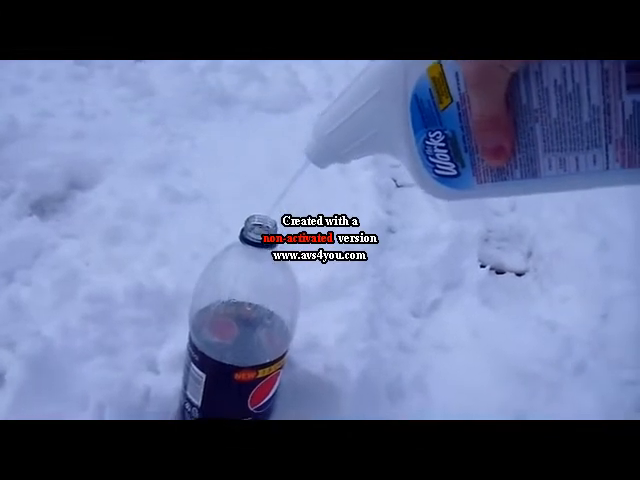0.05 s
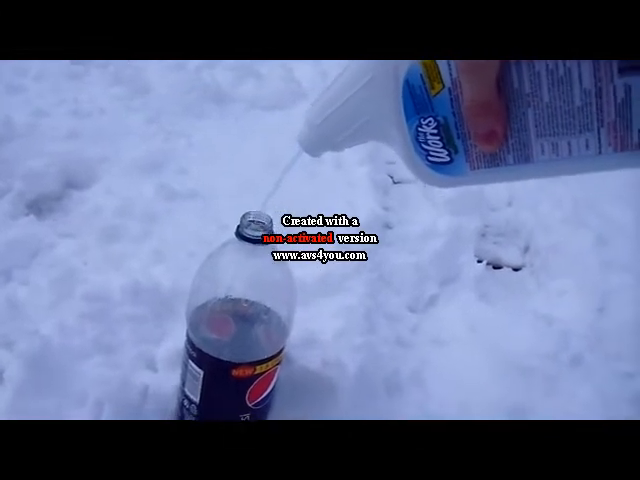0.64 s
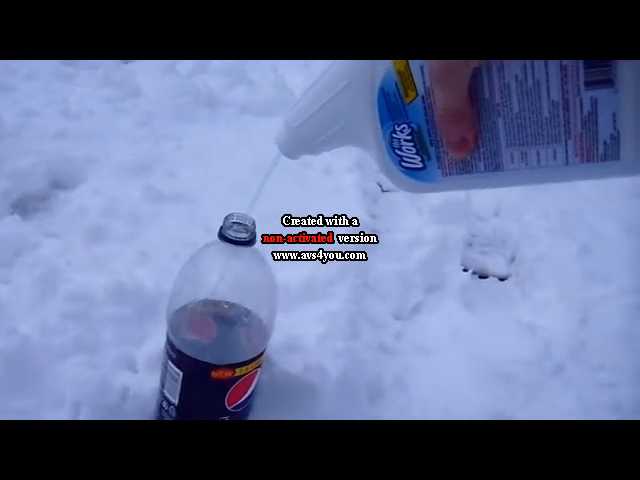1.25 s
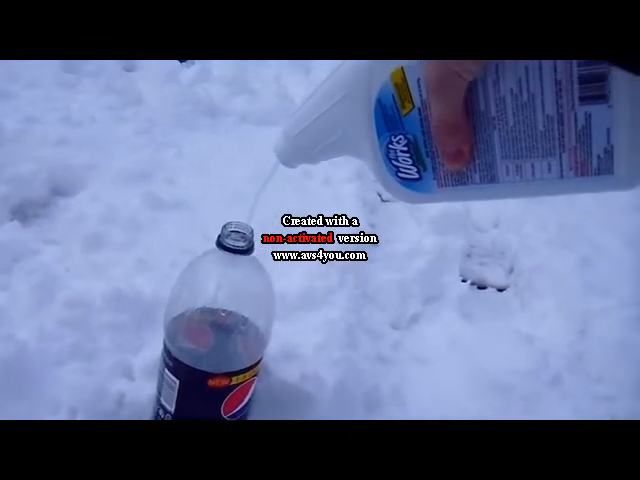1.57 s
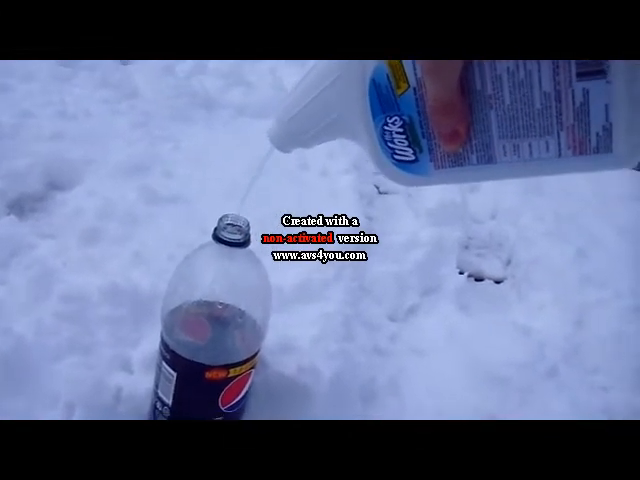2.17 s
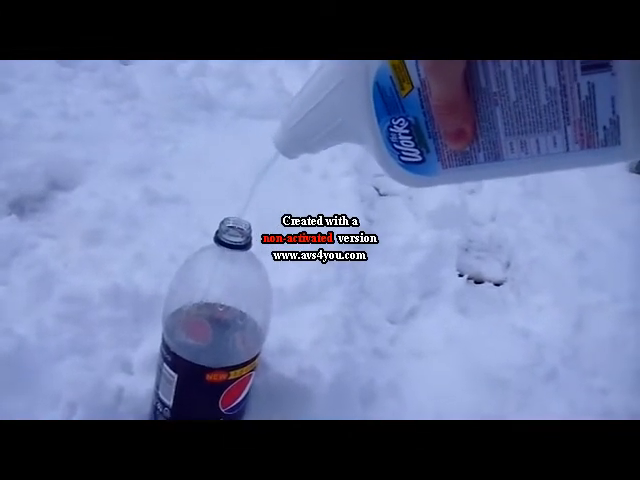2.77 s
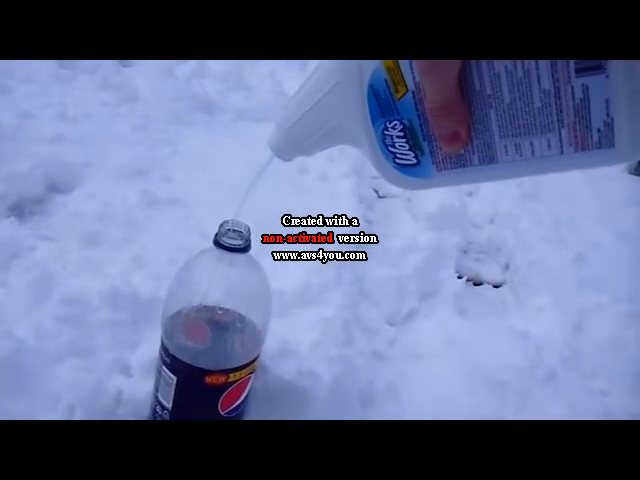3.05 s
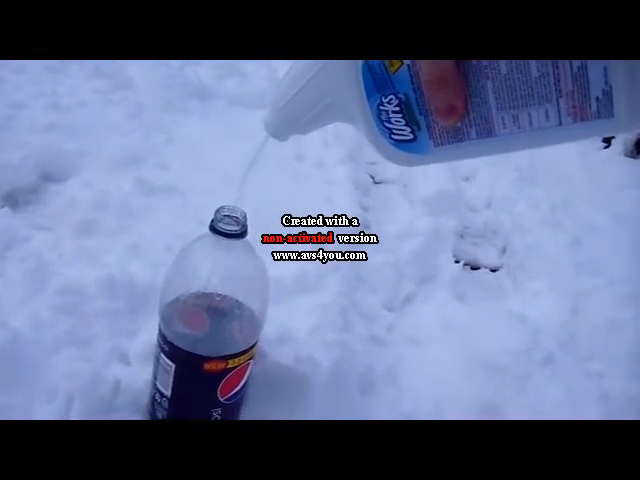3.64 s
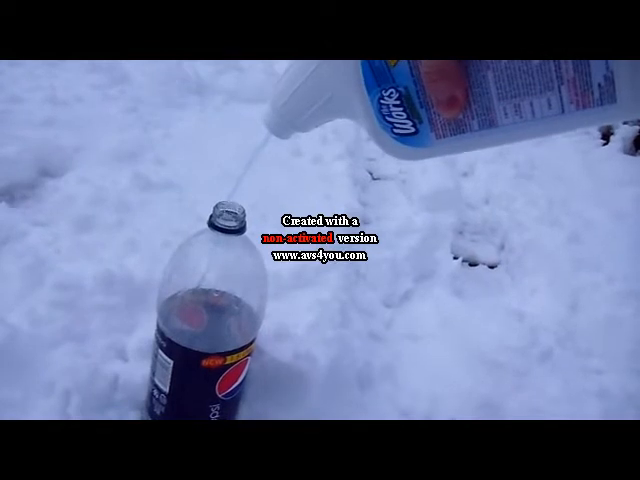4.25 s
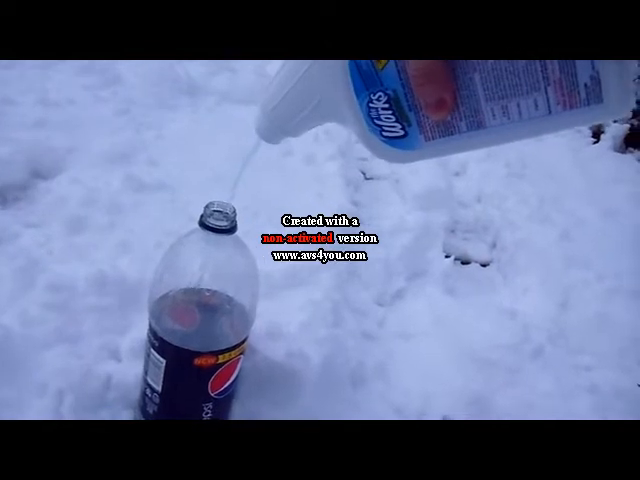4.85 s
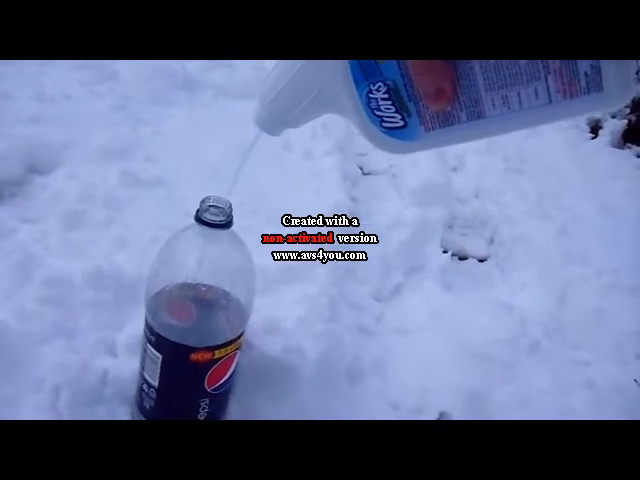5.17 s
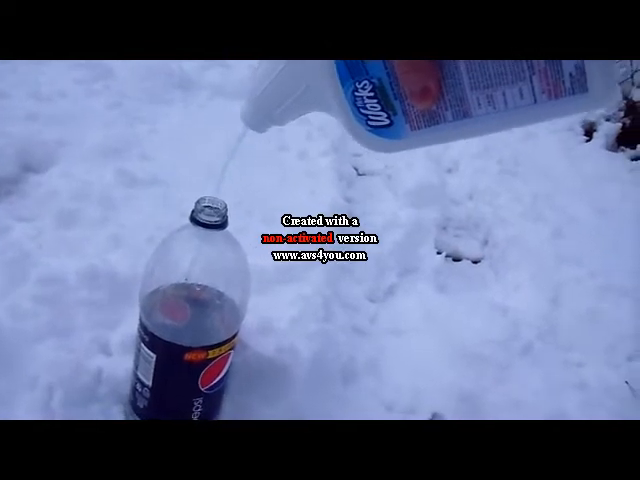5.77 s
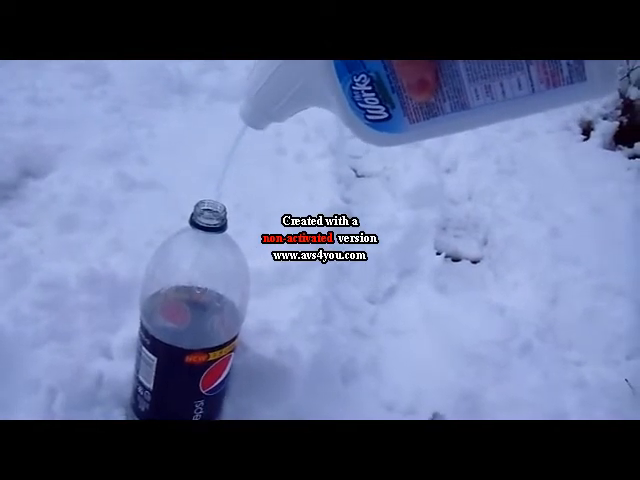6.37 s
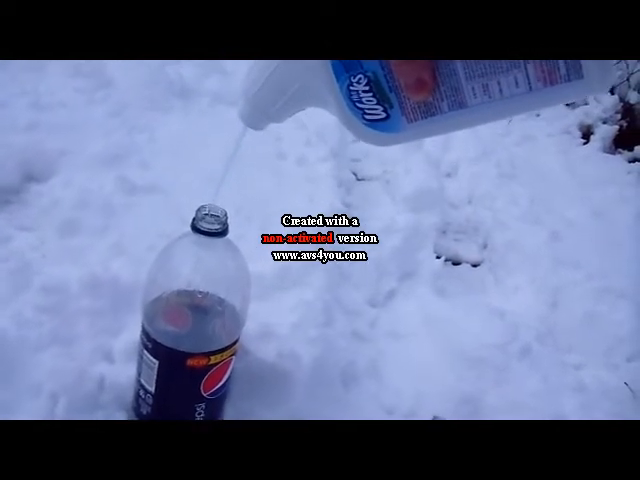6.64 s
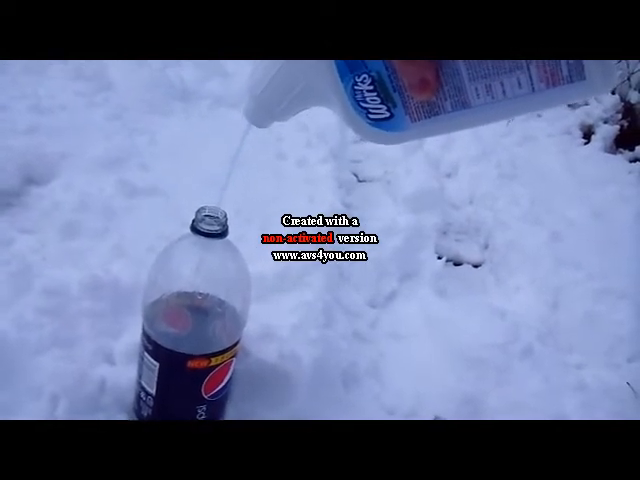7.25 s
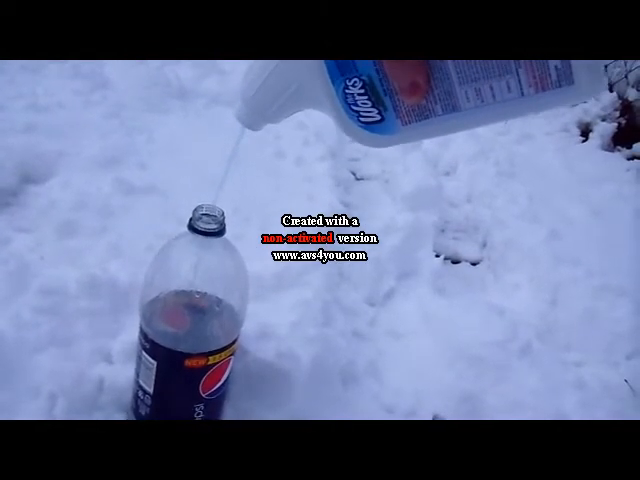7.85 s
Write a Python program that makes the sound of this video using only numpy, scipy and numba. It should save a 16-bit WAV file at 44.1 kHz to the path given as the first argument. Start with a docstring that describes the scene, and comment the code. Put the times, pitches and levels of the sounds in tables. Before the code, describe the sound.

A thin stream of liquid trickles and crackles into a plastic bottle outdoors, over a low steady rumble.

```python
"""Pouring into a plastic bottle

A thin stream falls from a jug into a half-full plastic bottle standing in snow. It breaks into drops; each
slaps the surface and traps a bubble that rings briefly, heard through the neck. Larger bubbles ring lower
notes, heavy blobs knock on the plastic and stray drops crack on the rim. Behind it all are a low rumble, far
traffic, one faint, distant horn and a brief hum."""
import sys
import numpy as np
from scipy import signal
from scipy.fft import rfft, irfft
from scipy.io import wavfile
from scipy.ndimage import uniform_filter1d
from numba import njit

SR = 44100
rng = np.random.default_rng(int(sys.argv[2]) if len(sys.argv) > 2 else 0)


def log_audio(samples):
    """Write samples as a 16-bit WAV file to the path given in sys.argv[1]."""
    # one column per channel
    frames = np.atleast_2d(samples).T
    # limit to full scale, then quantise
    limited = np.clip(frames, -1, 1)
    pcm = np.round(limited * 32767).astype(np.int16)
    wavfile.write(sys.argv[1], SR, pcm)


N = 348831

# strength of the stream, which twice runs smooth and almost silent: t/s, level/dB
STREAM_LEVEL = [(0.0, -64), (0.45, -66.5), (0.68, -57.5), (0.95, -62), (1.25, -54.5), (1.68, -56.5),
                (1.98, -51), (2.16, -54), (2.49, -50.5), (2.75, -61), (3.08, -67.5), (3.37, -69),
                (3.7, -56), (3.95, -47), (4.18, -55.5), (4.35, -55.5), (4.57, -54), (4.68, -58),
                (5.11, -53), (5.35, -53), (5.64, -54), (5.85, -52), (6.1, -52.5), (6.4, -53), (6.53, -50),
                (6.7, -54.5), (7.0, -51), (7.4, -51), (7.62, -49), (7.91, -50.5)]


def undb(db):
    """Turn decibels into a factor to multiply by."""
    return 10 ** (np.asarray(db) / 20)


def unit(x):
    """Scale a sound so that its average strength (rms) is 1."""
    return x / np.sqrt(np.mean(x ** 2))


def stream_level(t):
    """The stream's strength in dB at the times t."""
    return np.interp(t, *np.transpose(STREAM_LEVEL))


def wander(rate):
    """A smooth random wobble, about 1 in size, that takes a new turn rate times a second."""
    step = int(SR / rate)
    held = rng.standard_normal(N)[np.arange(N) // step]
    return 1.3 * uniform_filter1d(uniform_filter1d(held, step), step)


def colour(x, points):
    """Make some pitches louder and others softer, following rows of f/Hz, level/dB."""
    size = 2 ** 19
    hz, db = np.transpose(points)
    f = np.arange(size // 2 + 1) * SR / size
    gain = undb(np.interp(np.log(f + 1), np.log(hz), db))
    # fold the filter so that nothing rings before the sound that causes it
    cepstrum = irfft(np.log(gain))
    cepstrum[1:size // 2] *= 2
    cepstrum[size // 2 + 1:] = 0
    return irfft(rfft(x, size) * np.exp(rfft(cepstrum)))[:N]


@njit
def resonator(x, hz, width):
    """Let through a narrow band around a pitch that may move."""
    out, band, low = np.empty(len(x)), 0., 0.
    for i in range(len(x)):
        tuning, damping = np.tan(np.pi * hz[i] / SR), width / hz[i]
        swing = (band + tuning * (x[i] + 1e-18 - low)) / (1 + tuning * (tuning + damping))
        band = 2 * swing - band
        low += 2 * tuning * swing
        out[i] = damping * swing
    return out


def ring(x, modes, stretch=1):
    """Let x ring a set of notes (f/Hz, width/Hz, level/dB); stretch multiplies their pitches."""
    return sum(undb(db) * resonator(x, hz * stretch * np.ones(N), float(width))
               for hz, width, db in modes)


def pings(times, gains, hz, cycles, glide, size=640):
    """Short notes that start fast and die away; glide is the share by which their pitch rises."""
    age = np.arange(size) / SR
    turns = hz[:, None] * age
    fade = turns / np.reshape(cycles, (-1, 1))
    shape = (1 - np.exp(-turns)) ** 2 * np.exp(-fade)
    phase = 2 * np.pi * turns * (1 + glide * np.tanh(fade / 2))
    wave = shape / shape.max(1, keepdims=True) * np.sin(phase)
    at = (np.maximum(times, 0) * SR).astype(int)[:, None] + np.arange(size)
    return np.bincount(at.ravel(), (gains[:, None] * wave).ravel(), N)[:N]


def kicks(t, gains):
    """Pushes one sample long at the times t."""
    return np.bincount((np.maximum(t, 0) * SR).astype(int), gains, N)[:N]


def fading(x, decay_s):
    """Let every push die away smoothly."""
    return signal.lfilter([1], [1, -np.exp(-1 / (decay_s * SR))], x + 1e-18)


def outdoors(rumble_db=-43, hiss_db=-64, whine_db=-84, surge_at_s=3.12, surge_s=0.28):
    """Low rumble and far traffic swell slowly, under an even hiss with a thin whine."""
    # tone of the rumble and traffic: f/Hz, level/dB
    rumble_tone = [(8, -1.5), (22, 4), (32, -4.5), (50, -3.5), (68, -8.5), (98, -8), (140, -16.5),
                   (200, -27), (270, -31.5), (370, -28), (560, -28.5), (740, -26), (1300, -30.5),
                   (1800, -34), (3500, -64), (8000, -62.5)]
    # tone of the hiss: f/Hz, level/dB
    hiss_tone = [(1000, -5), (2000, 6.5), (2600, 1), (3600, -1), (6000, -1.5), (9000, -5.5), (12000, -5.5),
                 (15500, -9.5)]
    surge_db = np.exp(-((np.arange(N) / SR - surge_at_s) / surge_s) ** 2)  # one rise of 1 dB
    rumble = unit(colour(rng.standard_normal(N), rumble_tone))
    rumble *= undb(rumble_db + surge_db - 0.76 * wander(1.93))
    whine = unit(ring(rng.standard_normal(N), [(12010, 90, 0)]))
    hiss = unit(colour(rng.standard_normal(N), hiss_tone))
    return rumble + hiss * undb(hiss_db) + whine * undb(whine_db)


def stream(gain_db=1.5, spurt_db=2.0, lull_db=12, lull_s=0.015):
    """How loud the stream is over time: it wobbles into spurts and dips wherever it breaks."""
    # moments when the stream breaks: t/s
    breaks = [1.36, 1.795, 1.89, 3.57, 3.845, 4.08, 4.52, 5.17, 5.68, 6.145, 6.76, 6.84, 7.616, 7.724, 7.79,
              7.82]
    t = np.arange(N) / SR
    lulls = sum(np.exp(-((t - at) / lull_s) ** 2) for at in breaks)
    return undb(gain_db + stream_level(t) - lull_db * lulls + spurt_db * wander(25))


def thinned(t, chance, full_stream_db=-50):
    """A weak stream sheds fewer drops: say which fall, and the dB they gain by carrying the rest."""
    share = np.minimum(undb(stream_level(t) - full_stream_db) ** 1.5, 1)
    falls = chance < share
    return falls, -10 * np.log10(share[falls])


def splashes(t, db, hz, spray_db, cycles, spray_s, count=7,
             bubble_db=-5, slap_db=-11, slap_s=0.00048, droplet_db=1, mist_db=-5, lag_s=0.007):
    """A drop slaps the surface and rings one bubble; its spray falls back as droplets and mist."""
    # a clean entry with little spray lets the bubble ring longer
    bubbles = pings(t, undb(db + bubble_db), hz, cycles * undb(-0.062 * spray_db), glide=0.012)
    slaps = fading(kicks(t, undb(db + slap_db)), slap_s) * rng.standard_normal(N)
    # each droplet traps a small bubble of its own pitch; those that land late are weaker
    lag, pitch, size = rng.random((len(t) * count, 3)).T
    landings = np.repeat(t, count) + lag_s * lag
    gains = np.repeat(undb(db + spray_db + droplet_db), count) * size * undb(-11 * lag)
    droplets = pings(landings, gains, hz=1300 + 5000 * pitch, cycles=0.92, glide=0.074, size=200)
    mist_power = fading(kicks(t, undb(db + spray_db + mist_db) ** 2), spray_s / 2)
    mist = np.sqrt(mist_power) * rng.standard_normal(N)
    return bubbles + slaps + droplets + mist


def patter(gain_db=-4, spread_db=11, low_hz=2100, high_hz=5600, count=1500):
    """The stream pinches off into small drops: single ticks when weak, a wet crackle when strong."""
    when, size, pitch, chance = rng.random((count, 4)).T
    t = (np.arange(count) + 1.6 * when) / count * N / SR
    falls, extra_db = thinned(t, chance)
    db = spread_db * size[falls] ** 2 + extra_db
    hz = low_hz * (high_hz / low_hz) ** pitch[falls]
    ticks = splashes(t[falls], db, hz, spray_db=-3.5, cycles=1.8, spray_s=0.0059, count=3)
    return unit(ticks) * undb(gain_db)


def fizz(gain_db=-6, spread_db=12, low_hz=1900, high_hz=7000, count=6000):
    """Tiny bubbles burst all over the churned surface."""
    when, size, pitch, chance = rng.random((count, 4)).T
    t = when * N / SR
    bursts, extra_db = thinned(t, chance)
    gains = undb(spread_db * size[bursts] ** 2 + extra_db)
    hz = low_hz * (high_hz / low_hz) ** pitch[bursts]
    return unit(pings(t[bursts], gains, hz, cycles=4.4, glide=0.071, size=360)) * undb(gain_db)


def big_drops(typical_drop_db=-23.5, typical_stream_db=-52.5):
    """Bigger drops enter more cleanly; a harder stream makes them throw more spray."""
    # drops that stand out of the stream, with their bubble's pitch: t/s, level/dB, f/Hz
    drops = [(0.02, -43.5, 3260), (0.217, -38, 2740), (0.3247, -31, 3870), (0.564, -43, 3170),
             (0.686, -36.5, 2240), (1.129, -38, 2000), (1.187, -35, 2470), (1.4054, -23, 2490),
             (1.4535, -33, 2120), (1.476, -42, 3220), (1.508, -31, 2230), (1.567, -29.5, 2500),
             (1.5957, -25.5, 2000), (1.744, -33, 4330), (1.7619, -19, 2200), (1.8113, -35, 3600),
             (1.832, -34, 2150), (1.85, -25.5, 2140), (1.872, -28.5, 2670), (1.927, -34, 4300),
             (1.95, -31, 2700), (1.968, -34.5, 3100), (1.996, -37, 4300), (2.019, -33.5, 2150),
             (2.0832, -33, 2070), (2.304, -37, 2980), (2.332, -40, 2580), (2.343, -27.5, 3030),
             (2.37, -33.5, 2030), (2.41, -27.5, 2650), (2.431, -20, 2220), (2.494, -27, 2550),
             (2.647, -34.5, 2250), (2.765, -40.5, 4320), (2.9437, -38.5, 2310), (3.114, -40.5, 3330),
             (3.3343, -45, 3240), (3.4282, -38, 2070), (3.495, -28.5, 2120), (3.641, -42, 2400),
             (3.69, -24.5, 2320), (3.769, -39, 2660), (3.88, -31, 2240), (3.892, -44.5, 3070),
             (3.917, -29, 2100), (3.951, -35, 2200), (3.985, -33.5, 2320), (4.003, -30, 2280),
             (4.048, -32.5, 2050), (4.102, -31, 3140), (4.157, -40.5, 2910), (4.2, -41.5, 2900),
             (4.224, -34, 2380), (4.249, -35, 2930), (4.453, -38, 3150), (4.888, -33, 4830),
             (4.912, -41.5, 2740), (5.195, -29.5, 5060), (5.244, -35.5, 3480), (5.284, -31.5, 2250),
             (5.32, -43.5, 3100), (5.3413, -36.5, 3300), (5.428, -37, 2280), (5.464, -32, 2900),
             (5.551, -37, 3350), (5.721, -24, 5470), (5.745, -29, 2480), (5.787, -43, 2000),
             (5.828, -31.5, 3650), (5.878, -35, 4000), (5.922, -31.5, 2930), (5.942, -38.5, 2010),
             (5.96, -36, 3600), (5.997, -30.5, 3830), (6.013, -29, 4850), (6.19, -30, 2520),
             (6.221, -37, 2700), (6.253, -27, 4900), (6.357, -42, 2200), (6.37, -35.5, 2560),
             (6.499, -30.5, 2280), (6.541, -37, 2560), (6.5853, -39, 5450), (6.726, -34.5, 2520),
             (6.786, -28.5, 2620), (6.82, -29.5, 2540), (6.857, -31.5, 3530), (6.881, -38, 4410),
             (6.897, -32, 3200), (6.916, -28, 2670), (7.024, -43, 2630), (7.048, -38, 2900),
             (7.118, -36.5, 3300), (7.168, -36, 4390), (7.209, -30.5, 2460), (7.234, -29.5, 2320),
             (7.253, -34.5, 3900), (7.291, -31.5, 2700), (7.317, -36, 3320), (7.348, -33, 2540),
             (7.366, -29, 3300), (7.4, -38, 2900), (7.4301, -28.5, 2530), (7.455, -39.5, 2900),
             (7.493, -27.5, 3170), (7.509, -30, 2070), (7.523, -30.5, 3380), (7.536, -35.5, 4410),
             (7.575, -36, 2530), (7.637, -35, 2570), (7.663, -32.5, 3200), (7.7326, -29, 3780),
             (7.7452, -33, 2900), (7.768, -30, 3820), (7.804, -37, 2400), (7.8295, -29.5, 3860),
             (7.878, -41, 3400)]
    t, db, hz = np.transpose(drops)
    spray_db = -4.5 - 0.47 * (db - typical_drop_db) + 0.32 * (stream_level(t) - typical_stream_db)
    return splashes(t, db, hz, spray_db, cycles=1.82, spray_s=0.004)


def bottle_air(splash, scatter_db=-15, scatter_s=0.022, rise_per_s=0.003, heave=0.012):
    """Splashes scatter inside the bottle, ring the air in it and leave by the neck."""
    # notes of the air above the liquid: f/Hz, width/Hz, level/dB
    air_notes = [(1977, 123, 5), (2145, 20, 1), (2580, 73, 0.5), (3900, 94, -15), (4410, 83, -7),
                 (4680, 160, -5), (5750, 130, -16), (6330, 45, 3.5), (7300, 320, -1)]
    # how well each pitch gets out through the neck: f/Hz, level/dB
    neck_tone = [(300, -23), (1100, -3.5), (1600, -4.5), (1950, -1), (3000, 2), (4300, 0.5), (5700, 0),
                 (6600, -18), (7900, -11.5), (8700, -24), (15000, -30)]
    # the heaving surface scatters each splash differently, into a short noisy tail
    tail_power = fading(splash ** 2, scatter_s / 2) / (scatter_s / 2 * SR)
    inside = splash + undb(scatter_db) * np.sqrt(tail_power) * rng.standard_normal(N)
    # the notes rise as the bottle fills and wander as the surface heaves
    stretch = 1 + rise_per_s * (np.arange(N) - N / 2) / SR + heave * wander(14)
    return colour(inside + ring(inside, air_notes, stretch), neck_tone)


def bottle_wall(splash, flow, low_bubble_db=-1, ring_db=-2, shake_db=-2, thrum_db=-1):
    """Larger bubbles ring low notes and heavy blobs knock on the plastic; splashes and the plunging stream keep
    it ringing."""
    # larger bubbles with low notes that also shake the wall: t/s, level/dB, f/Hz
    low_bubbles = [(1.905, -43, 1060), (1.948, -42, 1110), (2.429, -45, 1190), (3.69, -42, 1030),
                   (3.917, -42, 1040), (4.096, -43.5, 1020), (5.284, -40, 1400), (6.808, -43, 1220),
                   (6.82, -42.5, 1150)]
    # notes of the thin wall: f/Hz, width/Hz, level/dB
    wall_notes = [(341, 60, 3.5), (458, 40, 3), (740, 44, 5.5), (1057, 150, -0.5), (1200, 100, -11),
                  (1497, 30, -7)]
    t, db, hz = np.transpose(low_bubbles)
    hits = pings(t, undb(db + low_bubble_db), hz, cycles=2.3, glide=0) + knocks()
    thrum = undb(thrum_db) * flow * rng.standard_normal(N)
    return hits + ring(undb(ring_db) * hits + undb(shake_db) * splash + thrum, wall_notes)


def rim_spatter(flow, spray_db=-26, spread_db=13, decay_s=0.0039, crack_db=-3, count=130):
    """Drops and fine spray crack on the rim of the neck and reach the open air still bright."""
    # drops that hit the rim: t/s, level/dB
    rim_hits = [(1.847, -35), (1.865, -39), (1.906, -36), (1.951, -36), (1.969, -37.5), (2.534, -39),
                (2.679, -40.5), (3.607, -39.5), (5.285, -44), (5.343, -39.5), (5.743, -37), (5.905, -42.5),
                (6.012, -39), (6.524, -39.5), (6.636, -38.5), (6.956, -40), (7.166, -39.5), (7.254, -37),
                (7.29, -35), (7.508, -39), (7.745, -39), (7.769, -38), (7.878, -36)]
    # tone of a crack on the rim: f/Hz, level/dB
    rim_tone = [(600, -40), (1500, -18), (2500, 8.5), (5500, 6), (6500, 2), (7800, 0), (9000, -14),
                (11200, -6), (13000, -27), (15500, -33)]
    when, size = rng.random((count, 2)).T
    specks = kicks(when * N / SR, undb(spread_db * size ** 2))
    spray = unit(fading(specks, decay_s)) * flow * undb(spray_db)
    t, db = np.transpose(rim_hits)
    cracks = fading(kicks(t, undb(db + crack_db)), decay_s)
    return colour((spray + cracks) * rng.standard_normal(N), rim_tone)


def prickle(gain_db=-26, spread_db=14, low_hz=6600, high_hz=12000, count=220):
    """Pinhead bubbles pop at the mouth of the bottle, each on one very high note."""
    when, size, pitch = rng.random((count, 3)).T
    hz = low_hz * (high_hz / low_hz) ** (pitch ** 2)
    gains = undb(spread_db * size ** 2) * low_hz / hz
    return unit(pings(when * N / SR, gains, hz, cycles=5, glide=0.046, size=360)) * undb(gain_db)


def blips(gain_db=3):
    """Some drops enter with little spray, and their deep bubbles ring on as clear notes."""
    # bubbles trapped deep in the liquid: t/s, level/dB, f/Hz
    deep_bubbles = [(0.195, -42.5, 3050), (0.3251, -29.5, 3830), (0.795, -36, 3080), (0.879, -40.5, 2400),
                    (1.928, -32.5, 4350), (2.4315, -20, 3870), (4.103, -37, 3180), (5.465, -41, 2570),
                    (5.552, -37, 5600), (5.879, -35, 4000), (6.015, -35, 4800), (6.727, -40, 2510),
                    (6.99, -42.5, 2560), (7.317, -36, 3320), (7.371, -36, 4610), (7.638, -36, 2630),
                    (7.733, -32.5, 3680), (7.865, -36, 4370)]
    t, db, hz = np.transpose(deep_bubbles)
    return splashes(t, db + gain_db, hz, spray_db=-8.5, cycles=5.1, spray_s=0.003)


def wavering_chord(notes, waver_rate, drift_rate, drift_hz, waver_db=2):
    """Pure notes (f/Hz, level/dB) that each wobble in loudness and pitch."""
    chord = np.zeros(N)
    for hz, db in notes:
        gain = undb(db + waver_db * wander(waver_rate))
        pitch = hz + drift_hz * wander(drift_rate)
        chord += gain * np.sin(2 * np.pi * np.cumsum(pitch) / SR)
    return np.sqrt(2) * chord


def horn(start_s=2.35, swell_s=0.31, hold_s=0.26, fade_db_per_s=38.5, gain_db=0.5):
    """One blast of a far horn: only its lowest notes arrive, each wavering on the way."""
    # the horn's chord: f/Hz, level/dB
    horn_notes = [(304, -67.5), (371.4, -69), (405, -67.5), (474, -78)]
    chord = wavering_chord(horn_notes, waver_rate=5.63, drift_rate=12, drift_hz=1.8)
    age = np.arange(N) / SR - start_s
    released_s = np.maximum(age - swell_s - hold_s, 0)
    return chord * np.clip(age / swell_s, 0, 1) * undb(gain_db - fade_db_per_s * released_s)


def hum(loudest_at_s=6.6, swell_s=0.82):
    """A faint hum swells and fades in the distance, wavering a little."""
    # the hum's two notes: f/Hz, level/dB
    hum_notes = [(353, -70), (480, -73)]
    chord = wavering_chord(hum_notes, waver_rate=13, drift_rate=10, drift_hz=2)
    return chord * np.exp(-((np.arange(N) / SR - loudest_at_s) / swell_s) ** 2)


def knocks(gain_db=-1, knock_hz=520, rebound_s=0.0028, rebound_db=-9.5):
    """A heavy blob of liquid bends the bottle in one sharp swing, and a weaker swing follows a few milliseconds
    later."""
    # blobs that hit the bottle: t/s, level/dB
    blobs = [(6.523, -40.5), (7.191, -35), (7.209, -44.5), (7.507, -38), (7.745, -37), (7.805, -43)]
    t, db = np.transpose(blobs)
    gains, hz = undb(db + gain_db), np.full(len(t), knock_hz)
    swing = pings(t, gains, hz, cycles=0.17, glide=0)
    rebound = pings(t + rebound_s, gains * undb(rebound_db), hz, cycles=0.17, glide=0)
    return swing + rebound


def scene():
    """Drops, patter and fine fizz in the bottle, out in the open air."""
    flow = stream()
    splash = big_drops() + blips() + flow * (patter() + fizz())
    pouring = bottle_air(splash) + bottle_wall(splash, flow) + rim_spatter(flow) + flow * prickle()
    return (pouring + outdoors() + horn() + hum())[None]


def record(dry):
    """Cut away the very highest treble."""
    top_hz = 15500
    return signal.sosfilt(signal.ellip(10, .2, 70, top_hz, fs=SR, output="sos"), dry)


dry = scene()
out = record(dry)
log_audio(out)
```